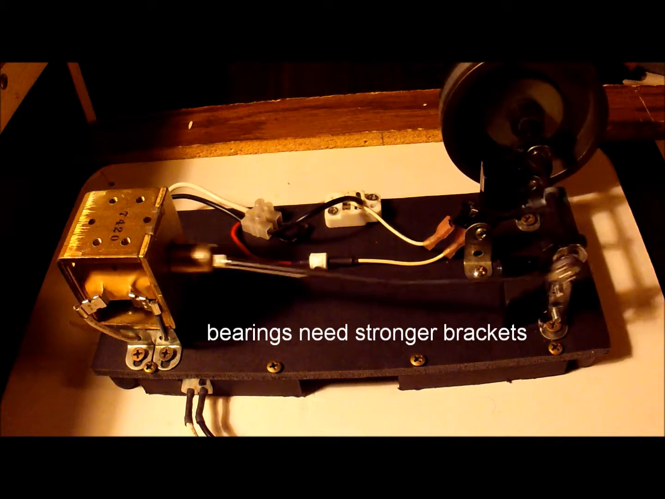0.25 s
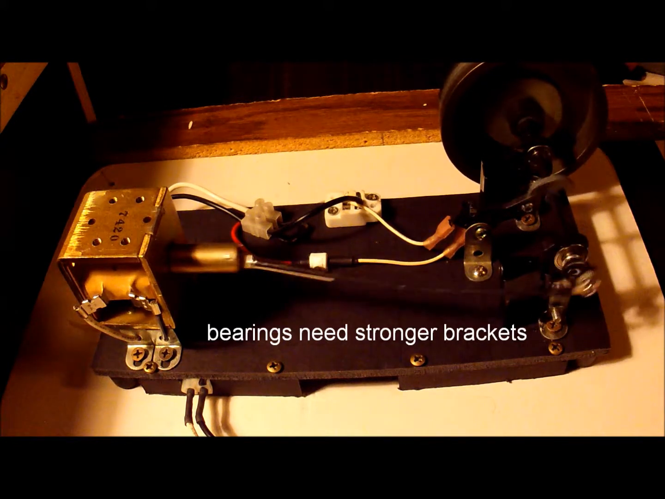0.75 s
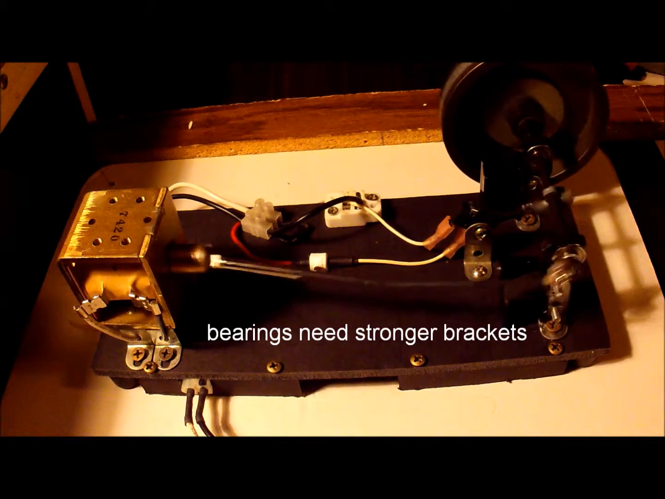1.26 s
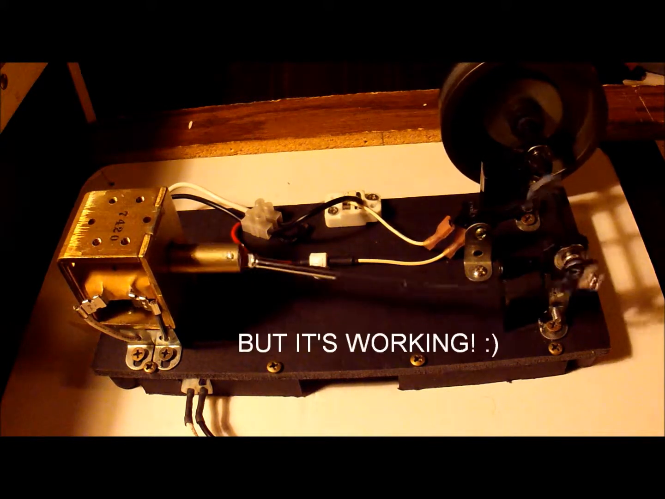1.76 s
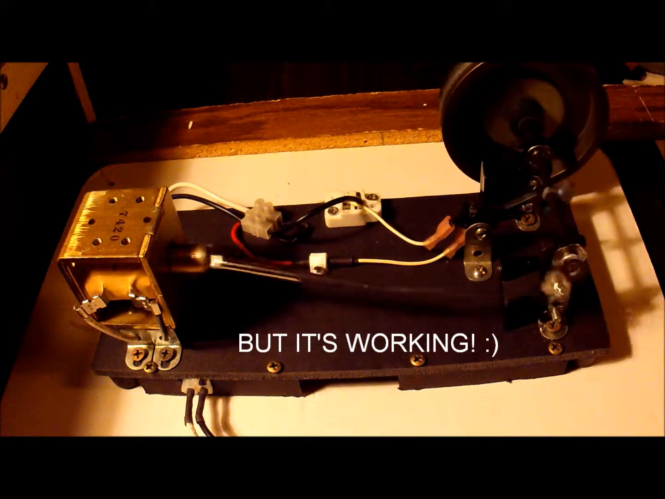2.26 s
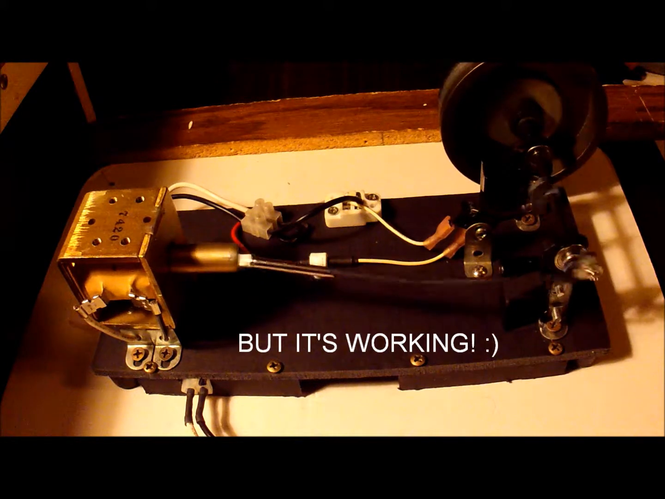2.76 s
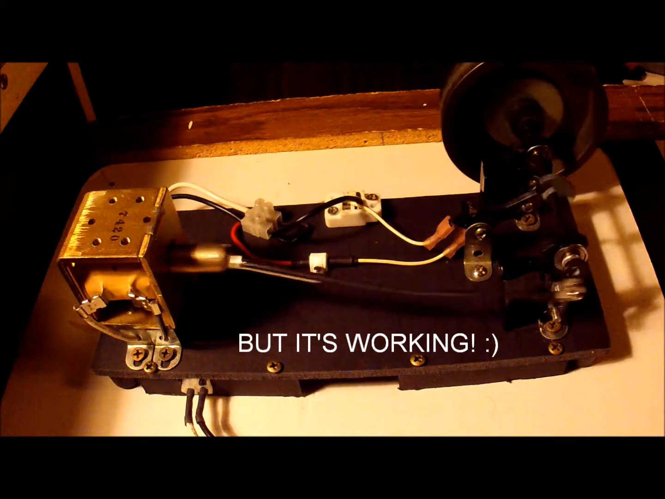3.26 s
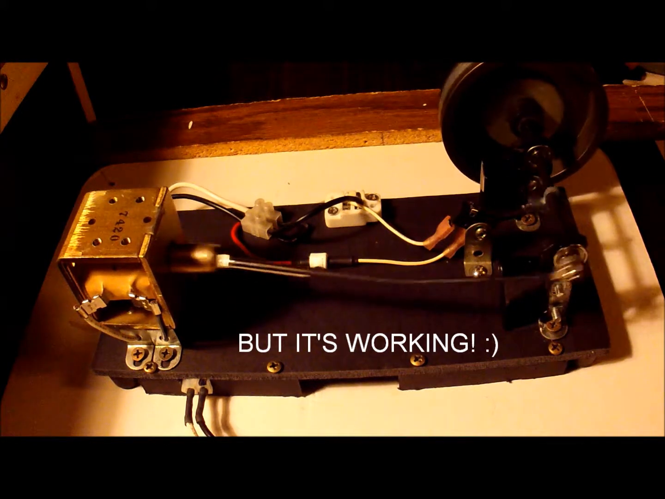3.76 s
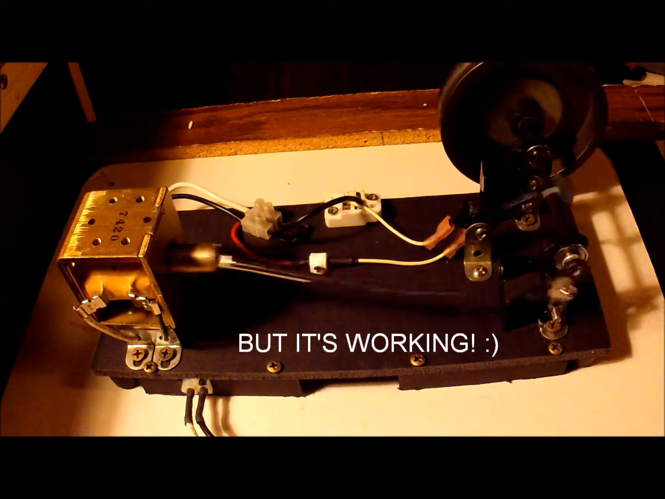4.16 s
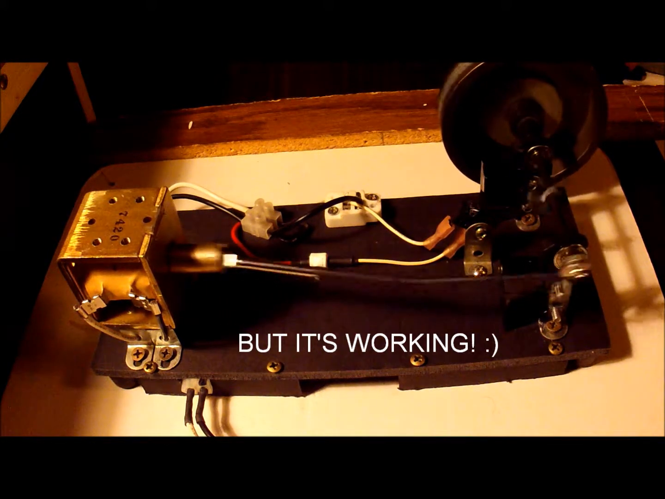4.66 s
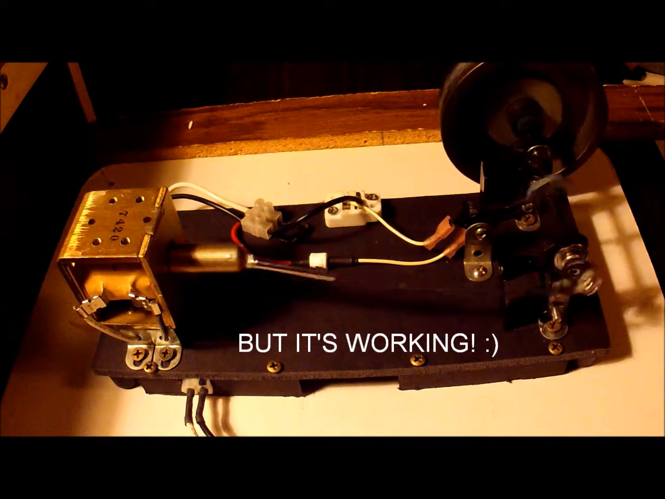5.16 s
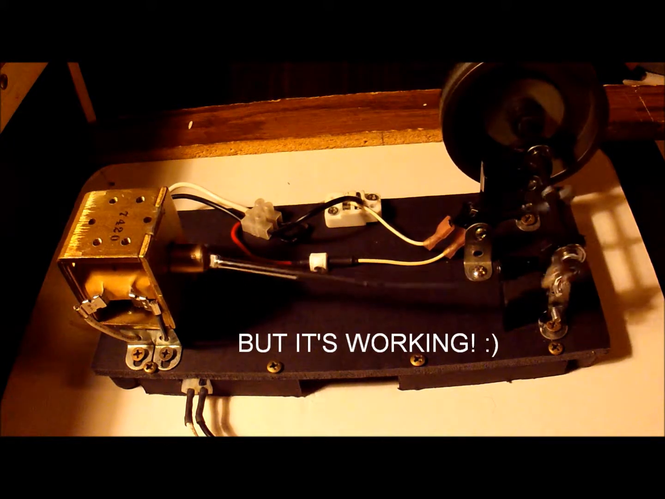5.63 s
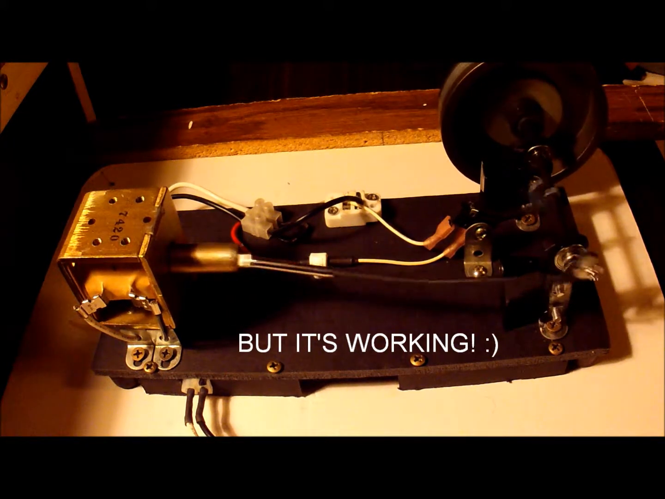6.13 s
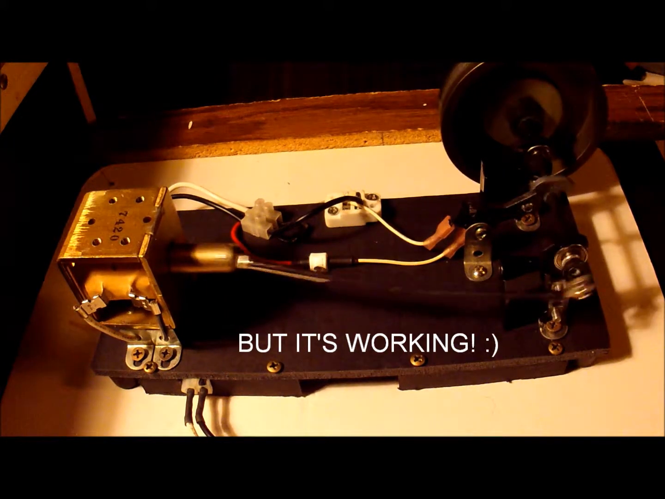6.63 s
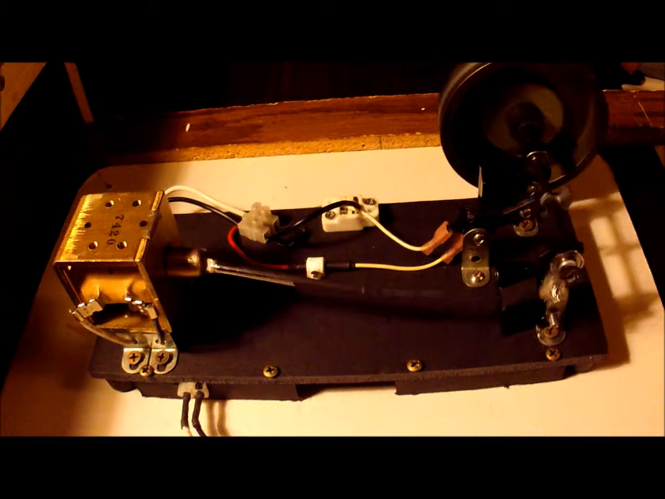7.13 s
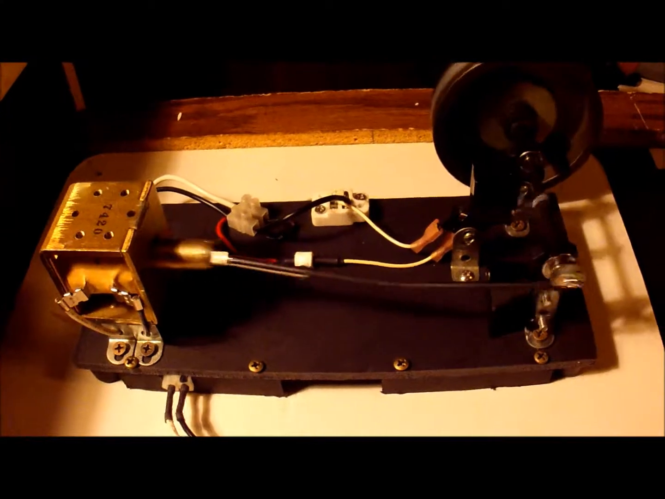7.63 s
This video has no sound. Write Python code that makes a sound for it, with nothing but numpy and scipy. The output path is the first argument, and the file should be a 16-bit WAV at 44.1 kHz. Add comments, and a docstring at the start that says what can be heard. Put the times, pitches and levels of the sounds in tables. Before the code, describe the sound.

A small solenoid engine clacks in a steady metallic rhythm, slowly speeding up, with a brief sizzle and a few stray knocks near the end.

```python
"""Homemade solenoid engine

A small engine runs close by on a table and slowly gathers speed. On each turn the crank takes up its
play, the plunger scrapes and chatters into the coil, the loose bearing bracket clacks against the
ringing frame and the switch ticks open. Near the end it sparks and gives a few stray knocks."""
import sys
import numpy as np
from scipy import signal
from scipy.fft import rfft, irfft
from scipy.io import wavfile
from scipy.ndimage import uniform_filter1d

SR = 44100
rng = np.random.default_rng(int(sys.argv[2]) if len(sys.argv) > 2 else 0)


def transcribe(u):
    """Save the signal u as a 16-bit wav file named by the first command-line argument.

    u: samples, shape (n,) or (channels, n), limited to [-1, 1]; the rate is SR.
    q: integer samples, one column per channel.
    """
    v = np.clip(np.atleast_2d(u).T, -1, 1)
    q = np.round(v * 32767).astype(np.int16)
    wavfile.write(sys.argv[1], SR, q)


N = 347949
TIME = np.arange(N) / SR
TURNS = 27

# stray knocks of the linkage: t/s, frame/dB, rod/dB, board thud/dB, spark/dB
STRAY_KNOCKS = [(6.8883, -38.5, -43, -70, -48), (7.546, -29.5, -33.5, -65, -35.5),
                (7.569, -51, -48, -56.5, -75), (7.68, -38, -22, -68, -67), (7.6816, -55, -47, -73, -71),
                (7.7826, -39, -35.5, -52, -59), (7.8043, -39, -50, -64, -75)]


def amp(db):
    """Decibels to gain."""
    return 10 ** (np.asarray(db) / 20)


def unit(x):
    """Scale to rms 1."""
    return x / np.std(x)


def through(x, response):
    """Play x through an impulse response."""
    return signal.fftconvolve(x, response)[:N]


def ring(hz, width, db, skirt=1.936, size=16384):
    """Ring of a set of modes after one tap, peak 1; db sets their balance."""
    f = np.fft.rfftfreq(size, 1 / SR)[:, None]
    power = np.sum(amp(db) ** 2 / (1 + (2 * (f - hz) / width) ** 2) ** skirt, axis=1)
    # minimum phase: nothing sounds ahead of the tap
    cepstrum = irfft(np.log(power))[:size // 2]
    cepstrum[0] = 0
    response = irfft(np.exp(rfft(cepstrum, size)))[:size // 2]
    return response / np.abs(response).max()


def disperse(response, hz=1200, width_hz=520):
    """Bending waves lag around the main modes, so a blow swells over a cycle or two."""
    b, a = signal.iirnotch(hz, hz / width_hz, fs=SR)
    return signal.lfilter(2 * b - a, a, response)


def treble(x, hz):
    """High-pass: a hard contact reaches only the high modes."""
    return signal.sosfilt(signal.butter(3, hz, "high", fs=SR, output="sos"), x)


def colour(x, points):
    """EQ x along a curve of f/Hz, gain/dB points."""
    hz, db = np.transpose(points)
    f = np.fft.rfftfreq(N, 1 / SR)
    gain = amp(np.interp(np.log(f + 1), np.log(hz), db))
    return irfft(rfft(x) * gain, N)


def taps(times, db):
    """One impulse for each contact."""
    out, at = np.zeros(N), np.round(np.ravel(times) * SR).astype(int)
    inside = (at >= 0) & (at < N)
    np.add.at(out, at[inside], amp(np.ravel(db))[inside])
    return out


def wander(rate):
    """Random drift with a spread near 1, on a new course rate times a second."""
    knots = rng.standard_normal(N // 10)
    return 1.366 * np.interp(TIME * rate, np.arange(len(knots)), knots)


def grains(rate, spread_db):
    """Tiny random collisions of two rough surfaces."""
    hits = rng.random(N) < rate / SR
    return hits * rng.choice([-1, 1], N) * amp(spread_db * rng.standard_normal(N))


def swells(t, rows, attack_s=.0042, release_s=.007):
    """Attack, hold and release for rows of t/s, length/s, levels/dB; one envelope per level column."""
    power = 0
    for start, length, *db in rows:
        attack = np.clip((t - start) / attack_s, 0, 1)
        release = np.exp(-np.maximum(t - start - length, 0) / release_s)
        power = power + np.outer(amp(db), attack * release) ** 2
    return np.sqrt(power)


def stick_slip(hz, waver, waver_rate, flutter_db):
    """Friction locks on to one mode: a tone unsteady in pitch and level."""
    pitch = hz * (1 + waver * wander(waver_rate))
    phase = 2 * np.pi * np.cumsum(pitch) / SR
    return unit(np.sin(phase) * amp(flutter_db * wander(150)))


def turns(speed_hz=3.06305, gain_hz_per_turn=.015238):
    """The flywheel speeds up: clack times, turn lengths and pace from 0 (slowest) to 1 (fastest)."""
    turn = np.arange(TURNS)
    sluggish_hz = .08 * np.exp(-turn / 2.745)  # still getting going
    hz = speed_hz + gain_hz_per_turn * turn - sluggish_hz
    period = 1 / hz
    clack_s = -.0174 + np.cumsum(period) - period
    return clack_s, period, (hz - hz[0]) / np.ptp(hz)


def clacks():
    """Time, blow level and rebound level of every clack."""
    # force of the clack, softer and more rattly at speed: t/s, blow/dB, rebounds/dB
    force = [(.3, -28, -28), (1.102, -23, -32.5), (2.199, -25, -31.5), (4.6, -24, -30.5), (6.3, -28, -29),
             (7.7, -27, -27)]
    at, blow_db, rebound_db = np.transpose(force)
    clack_s = turns()[0]
    return clack_s, np.interp(clack_s, at, blow_db), np.interp(clack_s, at, rebound_db)


def frame():
    """The ring of the frame when struck at the bracket and when rubbed by the plunger."""
    # frame modes: f/Hz, width/Hz, struck/dB, rubbed/dB
    modes = [(520, 86, -18.5, -55), (650, 67, -29.5, -60), (801, 133, -12.5, -27), (928.2, 62, -2, -3.5),
             (1096.5, 69, -2, -4), (1205, 128, 0, -8), (1330, 110, 2, -8.5), (1385, 54, 1, -3.5),
             (1537, 165, -1.5, -4.5), (1699, 122, -4, -7.5), (1835, 84, 0, -20.5), (2029, 97, -6.5, -16.5),
             (2117, 140, -7, -24.5), (2514, 182, -26, -18.5), (2640, 94, -29.5, -39.5),
             (3283, 94, -36, -31), (3360, 860, -39, -35), (3660, 58, -40, -27.5), (3905, 220, -40.5, -35.5),
             (4230, 200, -39.5, -35), (4440, 120, -26, -38), (4920, 460, -29, -40.5),
             (7500, 7100, -52, -48.5)]
    hz, width, struck_db, rubbed_db = np.transpose(modes)
    return ring(hz, width, struck_db), ring(hz, width, rubbed_db)


def background():
    """A steady bed of hiss and hum."""
    # colour of the room and microphone hiss: f/Hz, gain/dB
    hiss_eq = [(20, -8), (110, 0), (200, 1.5), (265, 8.5), (400, 0), (800, 1.5), (2500, -4.5), (4500, -8),
               (9000, -11), (12000, -2.5), (16000, -2)]
    # mains hum and electronic whine: f/Hz, rms level/dB
    tones = [(30, -85), (60, -82), (90, -86), (15231, -87)]
    hum = sum(np.sqrt(2) * amp(db) * np.sin(2 * np.pi * (hz * TIME + rng.random())) for hz, db in tones)
    hiss = unit(colour(rng.standard_normal(N), hiss_eq))
    return amp(-65) * hiss + hum


def room(x, t60_s=.2, build_s=.0057, wet_db=-18):
    """Diffuse tail of a small room, building up over the first few milliseconds."""
    t = TIME[:SR // 2]
    tail = rng.standard_normal(len(t)) * np.exp(-np.log(1000) * t / t60_s) * (1 - np.exp(-t / build_s))
    return amp(wet_db) * through(x, tail / np.linalg.norm(tail))


def bearings():
    """The balls of the flywheel bearings roll with a faint, fine patter."""
    # colour of the rolling: f/Hz, gain/dB
    roll_eq = [(300, -20), (750, -10.5), (950, -3), (1380, 2.5), (1750, -5.5), (2150, -6.5), (2500, -19.5),
               (4000, -26), (8000, -62.5)]
    rolling = unit(colour(grains(rate=3500, spread_db=2), roll_eq))
    return amp(-60.5) * rolling * amp(1.7 * wander(60))


def squeak():
    """On one stroke the dry sleeve squeaks faintly on a high mode of the frame."""
    # the dry stroke: t/s, length/s, level/dB
    stroke = [(6.136, .105, -65)]
    level, = swells(TIME, stroke)
    return level * stick_slip(hz=3290, waver=.009, waver_rate=300, flutter_db=3)


def base_board():
    """The board thuds under clacks and knocks, and rumbles when the engine rocks."""
    # board modes: f/Hz, width/Hz, level/dB
    modes = [(223.5, 27, 2.5), (262.6, 17, 8), (310, 73, 1.5), (512, 82, -6)]
    # spells of rocking: t/s, length/s, level/dB
    rocks = [(7.424, 0.06, -70), (7.55, 0.043, -76), (7.70, .19, -79)]
    board = ring(*np.transpose(modes))
    clack_s, blow_db, _ = clacks()
    knock_s, _, _, thud_db, _ = np.transpose(STRAY_KNOCKS)
    thuds = through(taps(clack_s, blow_db - 38) + taps(knock_s, thud_db), board)
    rocking, = swells(TIME, rocks, attack_s=.02, release_s=.025)
    return thuds + rocking * unit(through(rng.standard_normal(N), board))


def rod_pings(jitter_s=.001):
    """Thin high pings ring once a turn, most of them softer as the speed rises."""
    # pings: t from the clack/s, f/Hz, width/Hz, level when slow/dB, level when fast/dB
    pings = [(-.085, 4400, 220, -54, -65.5), (.002, 4400, 220, -56, -56.5), (.066, 2040, 420, -47.5, -61.5)]
    clack_s, _, pace = turns()
    out = 0
    for lag, hz, width, slow_db, fast_db in pings:
        late, louder = rng.standard_normal((TURNS, 2)).T
        db = np.interp(pace, (0, 1), (slow_db, fast_db)) + 1.5 * louder
        out = out + through(taps(clack_s + lag + jitter_s * late, db), ring(hz, width, 0))
    return out


def switch():
    """The contact spring ticks open after each clack, sooner and louder as the run goes on."""
    # spring modes: f/Hz, width/Hz, level/dB
    modes = [(8580, 1200, -4.5), (10540, 320, 1), (15030, 1700, -1.5)]
    clack_s = turns()[0]
    progress = clack_s / TIME[-1]
    open_s = clack_s + .0185 - .0105 * progress
    return through(taps(open_s, -48 + 5 * progress), ring(*np.transpose(modes)))


def sparks(rubbed, snap_s=.001):
    """The contact snaps with each jolt; while it drags it sizzles and scrapes on the frame."""
    # colour of a spark: f/Hz, gain/dB
    spark_eq = [(500, -40), (2500, 2.5), (4000, 5.5), (5500, -4.5), (9500, -8), (11500, 0.5), (16000, 0)]
    # drags of the contact: t/s, length/s, drive/dB
    drags = [(6.72, 0.17, -65), (6.903, 0.1, -56.5), (7.067, .05, -63), (7.317, 0.043, -58),
             (7.582, 0.1, -67)]
    knock_s, _, _, _, spark_db = np.transpose(STRAY_KNOCKS)
    snap = rng.standard_normal(N) * through(taps(knock_s - .0005, spark_db), np.exp(-TIME / snap_s))
    drag, = swells(TIME, drags, attack_s=.035, release_s=.024)
    crackle = drag * unit(grains(rate=4000, spread_db=3.5))
    high_modes = treble(rubbed, hz=1640)
    scrape = through(crackle, high_modes / np.linalg.norm(high_modes))
    return colour(snap + crackle, spark_eq) + amp(5.5) * scrape


def knocks(struck):
    """Single hard knocks of the linkage ring the frame and the connecting rod."""
    # rod modes: f/Hz, width/Hz, level/dB
    modes = [(1127, 95, 5.5), (1480, 170, 2), (2070, 300, -12), (2430, 630, -10.5), (3650, 390, -18.5),
             (4430, 430, -36)]
    rod = ring(*np.transpose(modes))
    knock_s, frame_db, rod_db, _, _ = np.transpose(STRAY_KNOCKS)
    return through(taps(knock_s, frame_db), struck) + through(taps(knock_s, rod_db), rod)


def crank_play(lead_s=.1725):
    """The crank takes up its play about half a turn before the clack, harder and tighter at speed."""
    clack_s, _, pace = turns()
    late_s = np.interp(pace, (0, 1), (.0028, .00036)) * rng.standard_normal(TURNS)
    db = np.interp(pace, (0, 1), (-41, -34))
    return taps(clack_s - lead_s + late_s, db)


def plunger(rubbed):
    """The plunger slides, chatters and bumps in its sleeve, in step with the crank."""
    # rubbing spots on an average turn: t from the clack/s, length/s, slide/dB, chatter/dB, grit/dB
    rubs = [(-.174, .022, -56.5, -56, -88), (-.122, .016, -52, -59.5, -55.5),
            (-.103, .009, -56, -45.5, -56.5), (-.086, .012, -42, -51.5, -61.5),
            (-.076, .015, -44.5, -46, -65.5), (-.053, .029, -54, -43.5, -62),
            (-.022, .015, -61, -48.5, -59), (.001, 0.023, -54, -55.5, -58.5)]
    # plunger and rod hit their guides on an average turn: t from the clack/s, dull bump/dB, tick/dB
    guide_hits = [(-.114, -50, -47), (-.082, -39.5, -48), (-.073, -41, -67.5), (-.066, -35, -77),
                  (-.063, -34, -69.5), (-.019, -37.5, -52), (.001, -51.5, -49)]
    clack_s, period, _ = turns()
    stretch = (period / period.mean()) ** .7  # a slow turn draws out the pattern
    turn = np.clip(np.searchsorted(clack_s, TIME - .08), 0, TURNS - 1)
    from_clack = (TIME - clack_s[turn]) / stretch[turn]
    slide, chatter, grit = swells(from_clack, rubs)
    # the coasting half of the turn rubs harder at speed; the coil pulls the same on every turn
    coasting = np.where(from_clack < -.088, (period.mean() / period[turn]) ** 6.3, 1)
    sliding = unit(through(grains(rate=2500, spread_db=2), rubbed))
    chattering = stick_slip(hz=1096, waver=.02166, waver_rate=200, flutter_db=2.56)
    # dry spots catch sharply and ring the high modes
    bright = treble(rubbed, hz=3200)
    bright /= np.abs(bright).max()
    scraping = unit(through(grains(rate=3000, spread_db=3), bright))
    rubbing = slide * sliding + chatter * chattering + grit * scraping

    lag, bump_db, tick_db = np.transpose(guide_hits)
    late, louder = rng.standard_normal((2, TURNS, len(lag)))
    hit_s = clack_s[:, None] + lag * stretch[:, None] + .0009 * late
    bumps = taps(hit_s, bump_db + 1.5 * louder) + crank_play()
    bumping = amp(-2.5) * through(bumps, disperse(rubbed, hz=1424, width_hz=440))
    # a bump drags on for a moment, which lets the rubbed modes sing
    dragging = amp(-17.5) * through(bumps, np.exp(-TIME / .0072)) * sliding
    ticking = through(taps(hit_s, tick_db + 1.5 * louder), bright)
    return coasting * rubbing + dragging + bumping + ticking


def bracket(struck, grind_s=.0035):
    """The main clack: the loose bearing bracket grazes, lands, rebounds and grinds to rest."""
    # bounces as it settles: t from the clack/s, level relative to the rebound force/dB
    bounces = [(.0052, 0), (.0078, -4), (.0112, -8.5)]
    clack_s, blow_db, rebound_db = clacks()
    blow_db = blow_db + .45 * rng.standard_normal(TURNS)
    graze = taps(clack_s - .0016, blow_db - 9.5)
    landing = taps(clack_s - .0003, blow_db)
    lag, bounce_db = np.transpose(bounces)
    late, louder = rng.standard_normal((2, TURNS, len(lag)))
    rebounds = taps(clack_s[:, None] + lag + .0006 * late, rebound_db[:, None] + bounce_db + 1.5 * louder)
    pressure = through(taps(clack_s, rebound_db - 7.5), TIME / grind_s * np.exp(1 - TIME / grind_s))
    grinding = through(grains(rate=3000, spread_db=4), struck)
    # level the texture, so the pressure alone sets the energy of each grind
    grinding /= np.sqrt(uniform_filter1d(grinding ** 2, size=400) + 1e-9)
    return through(graze + landing + rebounds, disperse(struck)) + pressure * grinding


def scene():
    """The engine's parts sound together in a small room, over hiss and hum, in mono."""
    struck, rubbed = frame()
    engine = bracket(struck) + plunger(rubbed) + knocks(struck) + base_board()
    engine = engine + rod_pings() + switch() + sparks(rubbed) + bearings() + squeak()
    return (engine + room(engine) + background())[None]


def record(dry, top_hz=15830):
    """Output EQ: three notches and a steep cut of the top."""
    # dips in the treble: f/Hz, width/Hz
    notches = [(3000, 430), (6000, 3280), (8030, 2800)]
    for hz, width in notches:
        dry = signal.lfilter(*signal.iirnotch(hz, hz / width, fs=SR), dry)
    return signal.sosfilt(signal.ellip(12, .2, 70, top_hz, fs=SR, output="sos"), dry)


dry = scene()
out = record(dry)
transcribe(out)
```